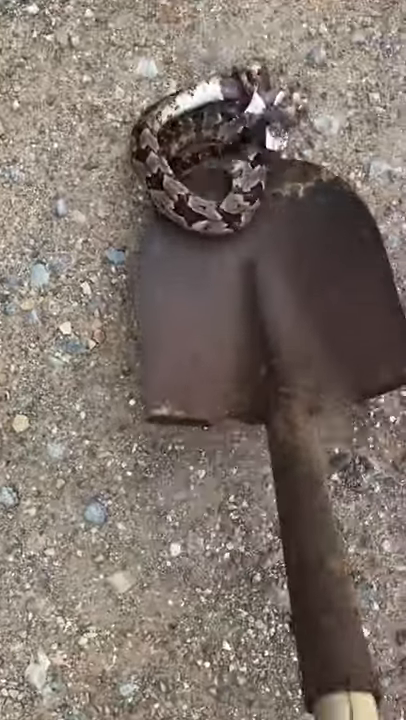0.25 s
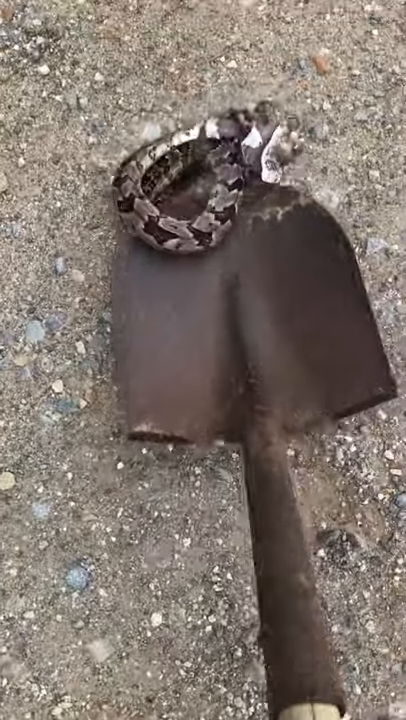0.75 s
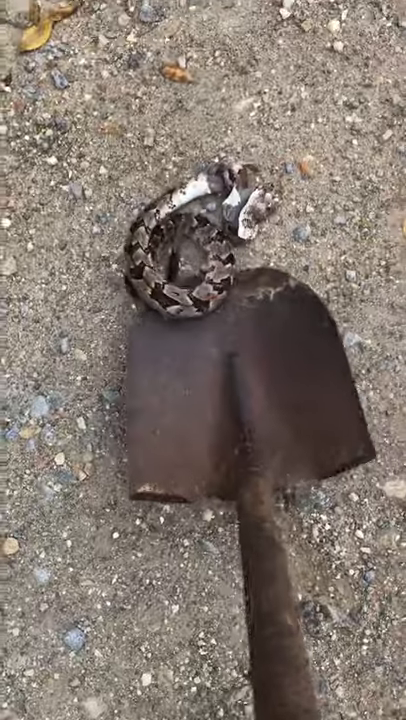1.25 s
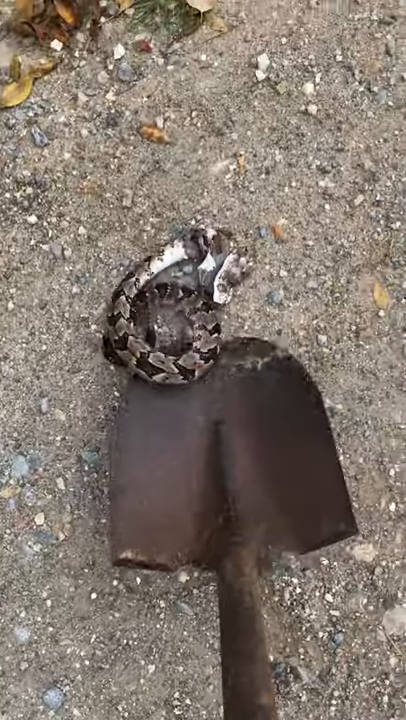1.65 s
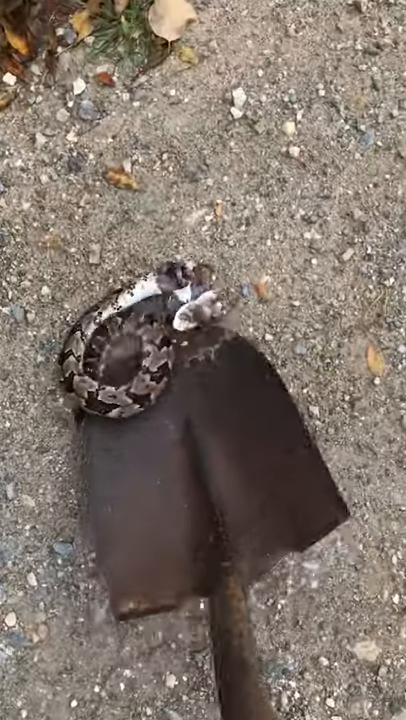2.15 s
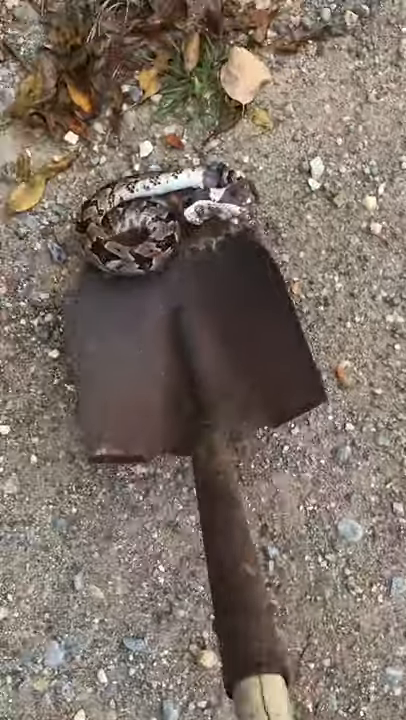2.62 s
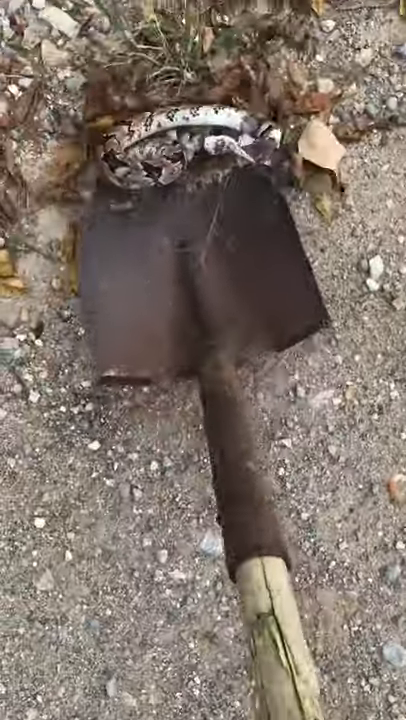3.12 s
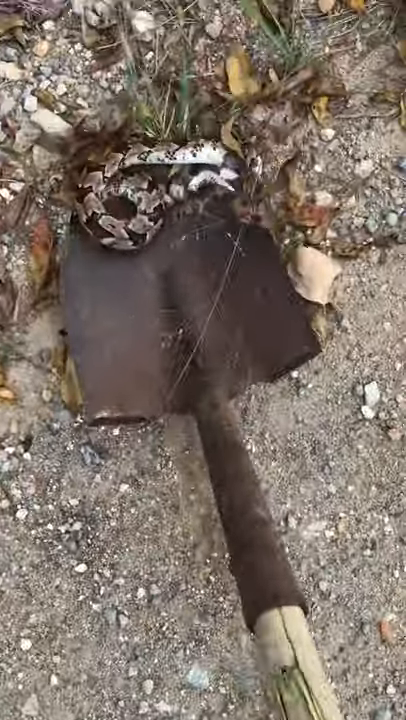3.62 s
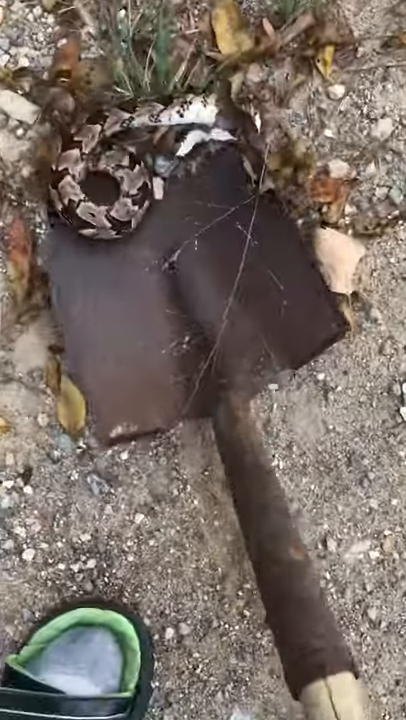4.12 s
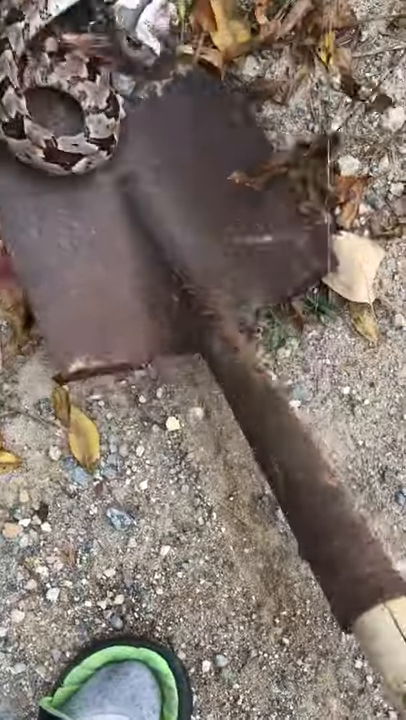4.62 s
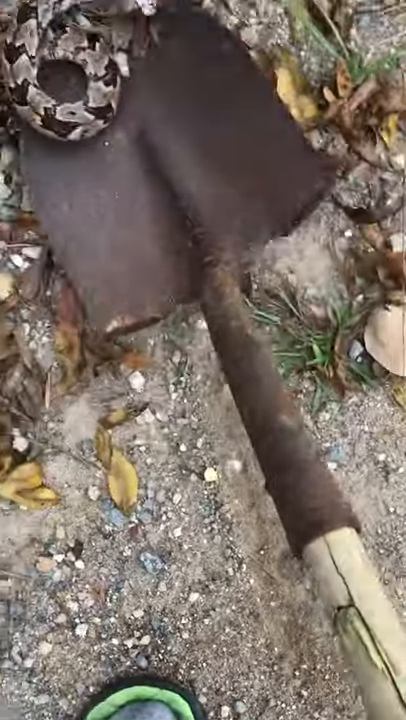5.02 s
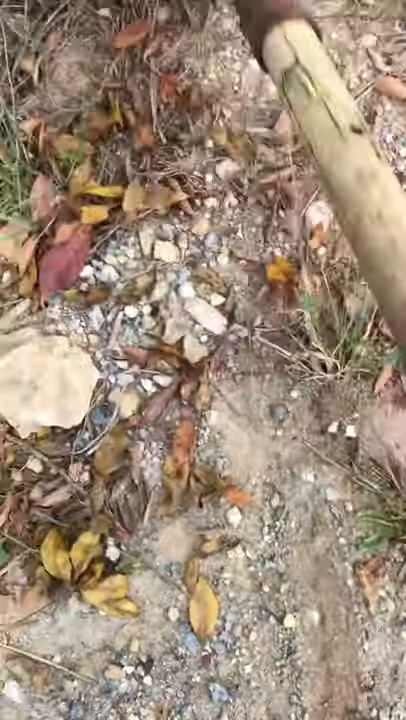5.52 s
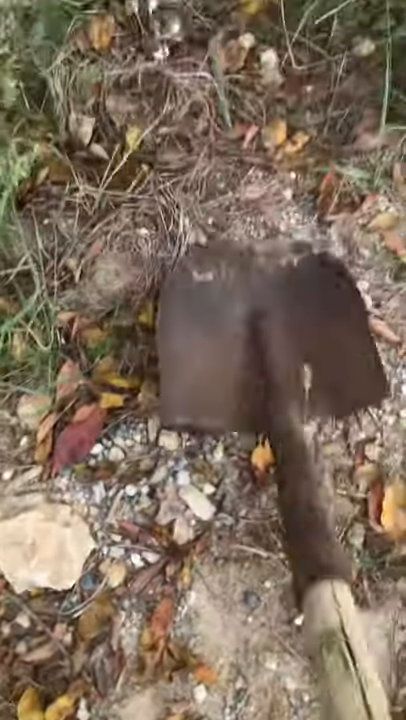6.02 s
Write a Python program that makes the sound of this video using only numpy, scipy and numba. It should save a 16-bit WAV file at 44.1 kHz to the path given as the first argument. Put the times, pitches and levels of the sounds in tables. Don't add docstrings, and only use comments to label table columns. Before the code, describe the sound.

A steel shovel is pushed in jerks over a gravel road, grating and clacking against stones, while a faint cricket trills in open air.

```python
import sys
import numpy as np
from scipy import signal
from scipy.fft import rfft, irfft
from scipy.io import wavfile
from scipy.ndimage import uniform_filter1d
from numba import njit

SR = 44100
rng = np.random.default_rng(int(sys.argv[2]) if len(sys.argv) > 2 else 0)


def how_loud(loudness_db):
    steps = np.asarray(loudness_db, float) / 20
    return 10 ** steps


def transcribe(signal):
    frames = np.atleast_2d(signal).T
    limited = np.clip(frames, -1, 1)
    pcm = np.round(limited * 32767).astype(np.int16)
    wavfile.write(sys.argv[1], SR, pcm)


N = 276058
STEP = 32

# start t/s, stop t/s, grit level/dB, sand share level/dB, blade share level/dB
SKID_EVENTS = [(0.357, 0.354, -51, 5, -1), (0.373, 0.397, -51, 7, 6.5), (1.159, 1.183, -48.5, -8, -8),
               (2.24, 2.288, -21, -7, 8), (2.34, 2.36, -31.5, -3.5, -4), (2.666, 2.697, -37.5, -2, 4.5),
               (2.722, 2.725, -36, -3, 8.5), (3.879, 3.941, -29, -4, 6.5), (3.999, 4.061, -54, -8, 12),
               (5.932, 5.976, -29, 2, -2.5), (5.616, 5.656, -47.5, 5, -13), (5.69, 5.734, -51.5, 9.5, -18),
               (5.751, 5.87, -57, 8.5, -16.5), (5.99, 6.038, -49, -2, -1)]
# t/s, thud level/dB, sand share level/dB, pitch the struck spot favours f/Hz
KNOCK_EVENTS = [(0.031, -24, -24, 930), (0.048, -24, -9, 940), (0.113, -25, -0.5, 943.4),
                (0.508, -33.5, -8, 1550), (0.638, -28.5, -4.5, 1520), (0.698, -25, -17, 1710),
                (0.738, -32, -1.5, 966.1), (1.374, -39.5, -40, 1260), (1.4, -37, -43, 2040),
                (1.775, -20, 9, 1736), (1.84, -25.5, -2.5, 1790), (1.921, -30, -38, 700),
                (2.296, -10, -9, 800), (2.524, -17, -5, 1950), (2.669, -25.5, -17, 1950),
                (2.719, -26, -20, 1950), (3.222, -30, -15.5, 1950), (3.249, -13.5, -24, 1200),
                (3.325, -15, -10, 1500), (3.653, -30, -10, 950.6), (3.807, -24.5, -1, 910),
                (3.835, -14.5, -36, 1038), (3.862, -16, -23, 860), (3.885, -9.5, -8.5, 1400),
                (4.009, -24, -1.5, 1699), (4.538, -24, -10, 905.1), (4.683, -24, -5, 1880),
                (4.799, -16, -20, 1206), (4.874, -16.5, -15, 1000), (6.17, -25.5, 2.5, 896)]
# t/s, crunch level/dB, sand share level/dB, pitch the struck spot favours f/Hz
CRUNCH_EVENTS = [(0.593, -33.5, 0.5, 3202), (1.634, -35, -2.5, 2700), (1.692, -28.5, 0, 2087),
                 (1.748, -24, -15, 1460), (2.238, -9, -4, 2448), (2.465, -23.5, -16, 3220),
                 (2.69, -31, 4, 2960), (2.849, -22, -19, 909.8), (2.919, -23, -36, 2150),
                 (3.063, -28, 3, 921), (3.083, -19.5, -10, 900), (3.151, -21, -7, 915),
                 (3.299, -22.5, -8.5, 3088), (3.365, -20.5, -4.5, 3146), (3.76, -22.5, -32, 1732),
                 (3.925, -19, -11, 1199), (4.745, -25, 3, 1850), (5.271, -25, -5, 940),
                 (5.93, -15, -34, 1947), (5.976, -18, -2, 1943), (0.655, -39, -2, 1700),
                 (0.796, -33, -4.5, 3002), (0.858, -36.5, -12, 2499), (2.81, -35.5, 2, 1502),
                 (2.836, -37, -2.5, 921.5), (2.883, -37, 10, 851.8), (2.99, -32, -14.5, 920),
                 (3.103, -28, 0, 1870), (3.18, -32.5, -1, 1401), (3.38, -28, -1, 4600),
                 (4.559, -32, 2, 3480), (4.725, -22, -5, 1401), (4.823, -24.5, -5, 4000),
                 (4.885, -23.5, -2, 1496), (5.118, -38.5, 2, 890), (5.197, -38, 0, 900),
                 (5.425, -44, 7, 1140)]


def curve(table):
    s, *columns = np.transpose(table)
    return np.array([np.interp(np.arange(N) / SR, s, c) for c in columns])


def slow_time():
    return np.arange(0, N, STEP) / SR


def unit(x):
    return x / np.sqrt(np.mean(x ** 2))


def band(x, lo_hz, hi_hz, order=2):
    return signal.sosfilt(signal.butter(order, [lo_hz, hi_hz], "bandpass", fs=SR, output="sos"), x)


def walk(rate):
    k = int(SR / rate)
    held = np.repeat(rng.standard_normal(N // k + 1), k)
    return 1.63 * uniform_filter1d(uniform_filter1d(held, k), k)[:N]


@njit
def grains(start, hz, cycles, size):
    out = np.zeros(N + 20000)
    for k in range(len(start)):
        turn = 2 * np.pi * hz[k] / SR
        p = np.exp(1j * turn - turn / (2 * np.pi * cycles[k]))
        z = size[k] * np.exp(1j * turn / 2)
        for i in range(min(20000, int(6 * cycles[k] * SR / hz[k]))):
            out[start[k] + i] += z.imag
            z *= p
    return out[:N]


@njit
def ring(force, hz, loss):
    out, z, p = np.empty(N), 0j, np.exp(2j * np.pi * hz / SR)
    for i in range(N):
        z = z * p * (1 - loss[i]) + force[i]
        out[i] = z.imag
    return out


def air():
    # f/Hz, density level/dB
    hiss_colour = [(88, -38), (150, -6), (380, -9.5), (466, -12.5), (2920, -20), (3620, -11.5), (4860, -45),
                   (8730, -26), (16000, -27)]
    colour_hz, colour_db = np.transpose(hiss_colour)
    hz = np.arange(N // 2 + 1) * SR / N + 1
    colour = how_loud(np.interp(np.log(hz), np.log(colour_hz), colour_db))
    return how_loud(-59.5) * unit(irfft(rfft(rng.standard_normal(N)) * colour, N))


def cricket(hz=3600, trill_hz=38):
    # t/s, level/dB
    trill_level = [(0, -58.5), (.35, -58), (.65, -57), (.95, -55.5), (1.3, -58.5), (1.7, -48), (2.1, -55),
                   (4.1, -59), (6.26, -71)]
    wing = np.cumsum(trill_hz * (1 + 0.054 * walk(12)) / SR) % 1
    glide_hz = hz * (1 + 0.027 * (.5 - wing))
    tone = np.sin(2 * np.pi * np.cumsum(glide_hz) / SR) * np.sin(np.pi * wing) ** 2
    chorus = unit(band(rng.standard_normal(N), 3590.0, 3694.0))
    return how_loud(curve(trill_level)[0]) * (0.5 * tone * how_loud(1.6 * walk(5.6)) + 0.3852 * chorus)


def wind():
    # peak t/s, rumble level/dB, time to fall 10 dB t/s
    gust_events = [(0.6, -57, 0.5), (1.42, -47, 0.19), (2.19, -36, 0.11), (2.78, -49.5, 0.0575),
                   (3.25, -41.5, 0.09), (3.52, -43, 0.16), (3.87, -33, 0.07), (4.2, -37.5, 0.0551),
                   (4.399, -34, 0.08), (4.569, -34, 0.01), (4.8, -42, 0.0834), (4.98, -29.5, 0.044),
                   (5.15, -55, 0.2143), (5.55, -43, 0.1397)]
    # t/s, peak level/dB, f/Hz
    buffet_events = [(0.695, -46, 123), (1.782, -38.5, 145), (2.185, -39, 130), (2.125, -37, 254),
                     (5.51, -43.5, 258), (5.587, -41, 148), (2.016, -39, 142.5), (2.083, -32, 121),
                     (2.22, -30.5, 248.8), (2.293, -40, 300), (2.821, -42, 135.8), (3.01, -37.5, 119.7),
                     (3.078, -39.5, 193), (3.243, -40, 132.4), (3.434, -32.5, 143), (3.45, -39, 236),
                     (4.405, -49, 230.1), (4.964, -50, 186), (5, -57, 199.3), (5.55, -42.5, 187),
                     (3.843, -42, 173.9), (3.916, -33, 120.9), (4.376, -44, 130), (4.797, -51, 119.1),
                     (2.139, -43, 221.1), (1.031, -58, 306), (5.458, -42, 131.2)]
    t = np.arange(N) / SR
    calm_db = -57.5
    gust = how_loud(calm_db) + sum(how_loud(db - 10 * abs(t - s) / fall) for s, db, fall in gust_events)
    rumble = unit(band(rng.standard_normal(N), 42.6, 86.0)) * how_loud(1.07 * walk(18))
    flutter = unit(band(rng.standard_normal(N), 111.0, 185.4, order=3)) * how_loud(5.9 * walk(24) - 20.5)
    s, peak_db, hz = np.transpose(buffet_events)
    buffets = grains((s * SR).astype(np.int64), hz, np.full(len(s), 2.2), how_loud(peak_db + 1.0))
    return gust * (rumble + flutter) + band(buffets, 83.24, 560.0)


def free_blade():
    # f/Hz, level/dB, t60 t/s
    free_modes = [(338, -16, 0.57), (517.5, -19, 1.6), (809, -9, 0.64), (947, -6.5, 0.33),
                  (1140, -8.5, 0.17), (1350, -15, 0.25), (1544, -14.5, 0.3), (1710, -3, 0.13),
                  (1990, -13, 0.28), (1895, -14, 0.32), (2070, -9, 0.34), (2300, -5, 0.2),
                  (2940, -5, 0.0889)]
    # t/s, level/dB, pitch the struck spot favours f/Hz
    taps = [
        (5.419, -46.5, 1130),
        (5.53, -44.5, 1640),
        (5.58, -46, 1950),
        (5.62, -50, 1480),
        (5.655, -50, 800),
        (5.932, -39, 1950),
        (5.945, -36, 1727),
        (5.985, -32.5, 1740),
        (6.09, -49, 1950),
        (6.169, -41, 1650),
    ]
    spot_gain_db, scatter = 9.5, 1.5
    s, tap_db, spot_hz = np.transpose(taps)
    scatter_db = scatter * rng.standard_normal((len(s), len(free_modes)))
    out = 0
    for (hz, db, t60), chance_db in zip(free_modes, scatter_db.T):
        spot_db = spot_gain_db * np.exp(-(np.log(spot_hz / hz) / 0.12) ** 2)
        force = np.zeros(N)
        force[(s * SR).astype(int)] = how_loud(tap_db + db + chance_db + spot_db)
        out = out + ring(force, 1. * hz, np.full(N, np.log(1000) / (max(t60, .02) * SR)))
    return out


def pings():
    # t/s, peak level/dB, f/Hz
    stone_pings = [(0.595, -47.5, 3170), (0.697, -37, 3820), (0.739, -34, 5600), (2.239, -14, 4060),
                   (2.243, -10.5, 2430), (2.247, -13, 2974), (2.465, -25.5, 3105), (2.466, -32, 2390),
                   (2.245, -21, 700), (2.297, -8.5, 812), (2.29, -14, 4010), (1.923, -38.5, 1192),
                   (2.525, -25, 4020), (2.69, -31, 5500), (2.699, -27.5, 2990), (2.712, -35.5, 6900),
                   (2.731, -36.5, 5230), (3.064, -29, 4050), (3.084, -36, 3080), (3.151, -22.5, 5300),
                   (3.3, -23, 3080), (3.366, -21, 3090), (3.886, -13, 3070), (5.52, -36.5, 5370),
                   (5.93, -12.5, 2053), (5.932, -21.5, 2700), (5.935, -12.5, 2813), (5.975, -19, 5410),
                   (5.979, -21.5, 2180), (6.012, -38.5, 8700), (6.171, -29.5, 2347), (6.169, -30, 870),
                   (5.945, -33, 1394), (5.97, -27, 1512), (6.116, -33, 4430), (3.837, -27, 1021)]
    # t/s, peak level/dB, f/Hz
    mode_blows = [(0.031, -30.5, 900), (0.05, -21.5, 1550), (0.048, -25, 1230), (0.072, -19.5, 990),
                  (0.073, -31, 1703), (0.114, -24, 943.1), (0.699, -35, 1400), (0.74, -36, 990),
                  (1.776, -26.5, 1723), (1.778, -37, 933.3), (2.258, -23.5, 635), (2.279, -13.5, 930),
                  (2.268, -19, 1350), (2.298, -37.5, 339), (2.53, -52.5, 339), (3.0, -52, 339),
                  (3.15, -51, 339), (2.25, -20, 1420), (5.985, -52, 630), (2.299, -15.5, 1723),
                  (2.298, -17, 750), (2.352, -27, 1950), (2.355, -37, 870), (2.524, -28, 1950),
                  (2.53, -24.5, 910), (2.555, -31, 922.8), (2.717, -22.5, 920), (3.89, -25, 1723),
                  (3.925, -23.5, 900), (4.012, -35.5, 1723), (4.535, -29.5, 880), (4.872, -22.5, 910),
                  (5.272, -31, 920), (5.275, -34.5, 1723), (6.169, -24, 900), (6.0, -41, 1020),
                  (2.29, -23, 1320), (1.78, -29, 1240), (0.87, -44, 1950)]
    # t/s, peak level/dB, f/Hz
    click_events = [(1.015, -31, 5500), (1.075, -32, 5495), (1.42, -19, 1998), (1.424, -11.5, 2430),
                    (1.921, -22.5, 907), (2.239, -3, 3500), (2.297, -10, 1500), (2.43, -35, 3000),
                    (1.776, -13.5, 4500), (2.969, -25, 7000), (3.886, -9, 2520), (3.985, -36, 2500),
                    (4.582, -24, 6000), (4.622, -18.5, 5996), (5.574, -14, 6960), (5.788, -25.5, 5994),
                    (5.885, -22.5, 5000), (0.113, -19, 3503), (0.508, -26, 4050), (3.063, -25, 5000),
                    (3.299, -24, 3505), (0.698, -35, 590), (0.215, -37, 5496), (0.228, -25, 5990)]
    ping_fade_ms, ring_fade_ms, rise_ms = 5.05, 16.9, 0.39
    s, peak_db, hz = np.transpose(stone_pings + mode_blows)
    mode_hz = hz[len(stone_pings):]
    mode_fade_ms = ring_fade_ms * np.clip(840 / mode_hz, 1, None) ** 1.5
    mode_fade_ms *= 1 + 0.37 * (abs(mode_hz / 1723 - 1) < .02)
    fade_ms = np.r_[np.full(len(stone_pings), ping_fade_ms), mode_fade_ms]
    start = (s * SR).astype(np.int64)
    tones = grains(start, hz, hz * fade_ms / 1000, how_loud(peak_db))
    tones = tones - grains(start, hz, hz * rise_ms / 1000, how_loud(peak_db))
    s, peak_db, hz = np.transpose(click_events)
    clicks = grains((s * SR).astype(np.int64), hz, np.full(len(s), 0.7), how_loud(peak_db + 3.5))
    return tones + band(clicks, 300.0, 11060)


def ticks(s, shares_db, chance, cycles, scatter_db, spot_hz=None):
    # f/Hz, level/dB
    tick_colour = [(600, -0.5), (850, -0.5), (1300, 1), (2200, 2.5), (3500, 4), (5500, 5.5), (8500, 8.5),
                   (11000, 3), (15500, 7)]
    colour_hz, colour_db = np.transpose(tick_colour)
    hz = 620 * (15800 / 620) ** chance[0]
    place = np.interp(np.log(hz), np.log([1150, 3600, 9500]), [0, 1, 2])
    db = sum(np.clip(1 - abs(place - k), 0, 1) * shares_db[k] for k in range(3))
    db = db + np.interp(np.log(hz), np.log(colour_hz), colour_db)
    if spot_hz is not None:
        db = db + 4 * np.exp(-(np.log2(hz / spot_hz) / 0.2) ** 2)
    size = how_loud(db - scatter_db * np.log(chance[1] + 0.008))
    size = size * np.sqrt(hz / 3600) * np.sign(chance[2] - .5)
    start = np.clip(s * SR, 0, N - 1).astype(np.int64)
    return grains(start, hz, cycles * (.5 + chance[3]), size / np.sqrt(cycles))


def stroke(start, stop, end_db, swell_db, let_go_db_s):
    t = slow_time()
    grip_s = 0.012
    db = np.interp(t, [start, stop], [end_db - swell_db, end_db]) - let_go_db_s * np.clip(t - stop, 0, 1)
    return (how_loud(db) * np.clip((t - start) / grip_s + 1, 0, 1)) ** 2


def push():
    # t/s, level/dB
    trickle = [(0, -52), (1.25, -61.5), (1.96, -71), (2.3, -50), (4.1, -54.5), (6.26, -52.5)]
    # start t/s, stop t/s, grit at the stop level/dB, swell level/dB, sand share level/dB
    shoves = [(0.0, 0.06, -23, 29, -2), (0.066, 0.191, -46, 5, 0), (0.22, 0.262, -55.5, 6, 8.5),
              (0.598, 0.653, -44, 11, 2), (0.68, 0.807, -44, -0.5, -2), (0.807, 0.894, -51, -6.5, -5),
              (1.371, 1.407, -34.5, 7.5, -20), (1.463, 1.619, -57, 0, -6), (1.622, 1.653, -53, -1, 0),
              (1.687, 1.723, -46, -3, 0), (1.74, 1.769, -34.5, 3.5, 1), (1.809, 1.958, -46.5, -5.5, -12.5),
              (1.992, 2.017, -45, -4.5, -12), (2.054, 2.064, -47.5, -7, 2.5), (2.12, 2.145, -50.5, -3, 8),
              (2.037, 2.227, -40.5, 8, -4.5), (2.437, 2.618, -42.5, 2, -4), (2.757, 2.83, -45.5, 8, -1.5),
              (2.832, 2.937, -40.5, 2, 2.5), (2.962, 3.043, -36, 7.5, -1), (3.062, 3.102, -36.5, -1, -3.5),
              (3.123, 3.181, -33.5, 4.5, -1.5), (3.205, 3.269, -34.5, 1, -1), (3.295, 3.367, -31.5, 1, -1),
              (3.393, 3.429, -44, -2.5, 3.5), (3.415, 3.56, -65, 9, 12), (3.642, 3.69, -37.5, 1.5, -9),
              (3.723, 3.84, -34.5, 3, -5.5), (3.851, 3.876, -24.5, 4, -6.5), (3.948, 3.981, -47.5, 1, 6.5),
              (4.164, 4.538, -43, 3.5, 2.5), (4.507, 4.608, -35.5, 5, 5.5), (4.626, 4.74, -34, 4, 2),
              (4.764, 4.888, -33, 1, 2), (4.887, 4.922, -44, -2, -0.5), (4.92, 5.066, -51, -2.5, -12),
              (5.084, 5.175, -37, 9.5, 0), (5.189, 5.299, -41, -4, 2.5), (5.307, 5.592, -45.5, 2.5, 3),
              (5.866, 5.929, -45.5, 7, 7), (6.074, 6.183, -42.5, 3.5, 7.5)]
    power = how_loud(curve(trickle)[0, ::STEP]) ** 2 * how_loud(np.array([[-3.5], [0], [0]])) ** 2
    for start, stop, db, swell_db, sand_db in shoves:
        shares_db = np.array([[2 - 0.24 * sand_db], [0], [sand_db]])
        power = power + stroke(start, stop, db, swell_db, let_go_db_s=516) * how_loud(shares_db) ** 2
    for start, stop, db, sand_db, blade_db in SKID_EVENTS:
        shares_db = np.array([[blade_db], [0], [sand_db]])
        power = power + stroke(start, stop, db, -2.5, let_go_db_s=908) * how_loud(shares_db) ** 2
    return 10 * np.log10(power)


def scrape(shares_db, count=100000, jerk_db=1.0, patchy_db=1.3):
    chance = rng.random((count, 5)).T
    jerks_db = jerk_db * (walk(35) + 0.75 * walk(150))
    jerks_db = jerks_db + patchy_db * np.array([walk(70) for _ in shares_db])
    jerky_db = shares_db + jerks_db[:, ::STEP]
    moment = (chance[4] * N).astype(int) // STEP
    return ticks(chance[4] * N / SR, jerky_db[:, moment] - 6.6, chance, cycles=2.87, scatter_db=2.5)


def cracks(count=60):
    # t/s, crack level/dB, sand share level/dB
    chips = [(0.07, -18.5, 1.5), (0.113, -24.5, -17), (1.022, -45, -2.5), (1.034, -43, -10),
             (1.126, -44, -29), (1.174, -36, -14), (1.423, -24.5, -32), (1.774, -21, -3), (1.508, -36, -32),
             (1.553, -30.5, -34), (1.921, -25, -24), (3.488, -37, 1.5), (3.568, -37, -3),
             (3.885, -16.5, -5.5), (4.095, -37, 0), (4.981, -36.5, -3), (5.023, -42, 3), (5.965, -21, 1),
             (0.738, -32.5, -2), (2.9, -40, 12), (3.084, -28, -6), (3.337, -23, -6.5), (4.831, -30, -10.5),
             (4.944, -36, -2), (5.709, -44, 6), (6.091, -40, -1)]
    # t/s, snap level/dB, grit share level/dB
    snaps = [(0.149, -39, 11), (0.315, -35, -25), (0.806, -33, -28), (0.941, -40, -29), (0.963, -42.5, -29),
             (1.671, -41, -12.5), (1.733, -42, -10), (1.807, -37.5, -11), (1.819, -33, -18),
             (1.869, -34, -24), (1.899, -38, -8), (1.991, -46, -4), (2.056, -44, -23), (2.125, -36, -2),
             (2.97, -33, -14), (3.441, -34, -3), (4.197, -48, -14.5), (4.581, -22, -13), (4.62, -27, 0),
             (5.45, -27.5, -13.5), (5.574, -27.5, -5), (5.62, -32, -3), (5.682, -30.5, -18),
             (5.7, -30, -12), (5.788, -28, -20), (5.885, -38, 2.5), (6.116, -23, -11), (6.128, -27, -9),
             (6.149, -34, -2)]
    # time s, favoured Hz, rise ms, fade ms, thud dB, grit dB, sand dB
    stones = [(s, hz, 1.3, 2.4, db, db - 5 + 0.34 * sand, db + sand) for s, db, sand, hz in KNOCK_EVENTS]
    stones += [(s, hz, 1.3, 5, db - 5, db, db + sand) for s, db, sand, hz in CRUNCH_EVENTS]
    stones += [(s, 2800, 0.55, 0.5, db - 3.5, db, db + sand) for s, db, sand in chips]
    stones += [(s, 6000, 0.55, 0.9, db + grit - 20, db + grit, db) for s, db, grit in snaps]
    chance = rng.random((len(stones), count, 6)).reshape(-1, 6).T
    s, spot_hz, rise_ms, fade_ms, *shares_db = np.repeat(np.array(stones), count, axis=0).T
    late_ms = -(np.log(chance[4]) * fade_ms + np.log(chance[5]) * rise_ms) - rise_ms
    return ticks(s + late_ms / 1000, np.array(shares_db) - 5.0, chance,
                 cycles=3.75, scatter_db=1.03, spot_hz=spot_hz)


def blade(force, spot_db=4, spread=0.072):
    # f/Hz, level/dB, free t60 t/s
    blade_modes = [(341, -23.5, 0.55), (534, -20, 0.21), (639, -15.5, 0.14), (767, -28, 0.16),
                   (899, -3, 0.087), (932, -4.5, 0.23), (1130, -15.5, 0.051), (1213, -14, 0.28),
                   (1340, -12, 0.1167), (1430, -12.5, 0.18), (1487, -5, 0.11), (1537, -7, 0.21),
                   (1727, -5, 0.17), (1950, -4, 0.18), (2113, -6.5, 0.11), (2303, -15, 0.0758),
                   (2455, -12, 0.1), (2940, -13, 0.092), (3140, -5, 0.088),(4190, -6.5, 0.1)]
    # f/Hz, level/dB, t60 t/s
    edge_modes = [(2545, -7, 0.14), (3410, -4.5, 0.054), (3840, -21, 0.039), (4546, -3, 0.045),
                  (5500, -5, 0.098), (6050, -4.5, 0.05), (6820, -16, 0.073), (9800, -5, 0.055)]
    # t/s, freedom (0 pressed into the road - 1 in the air)
    freedom = [(0, 0.79), (1.2, 0.1), (2.29, 0.14), (2.31, 0.76), (2.9, 0.47), (5.5, 0.19), (5.9, 0.37),
               (6.26, 4.6)]
    t = np.arange(N) / SR
    pressed = 0.2367 * sum((t > start) & (t < stop) for start, stop, *_ in SKID_EVENTS)
    damping = 1 + 2.37 * np.clip(1 - curve(freedom)[0] + pressed, 0, 1) ** 2
    s, *_, spot_hz = np.transpose(sorted(KNOCK_EVENTS + CRUNCH_EVENTS))
    spot_hz = spot_hz[np.clip(np.searchsorted(s - .003, slow_time()) - 1, 0, None)]
    out = 0
    for hz, db, t60 in blade_modes + edge_modes:
        drive_db = db + 1.54 * walk(40)[::STEP] + spot_db * np.exp(-(np.log(spot_hz / hz) / spread) ** 2)
        drive = np.repeat(how_loud(drive_db), STEP)[:N]
        out = out + ring(force * drive, 1. * hz, damping * np.log(1000) / (max(t60, .02) * SR))
    return band(out, 260.0, 22000, order=3)


def scene():
    grit = scrape(push())
    broken = band(cracks(), 310, 13600, order=1)
    direct = band(grit + broken, 826.0, 14550, order=3)
    shovel = direct + how_loud(-37.5) * blade(grit + how_loud(-2.5) * broken)
    bounce = np.r_[np.zeros(17), shovel[:-17]]
    return (shovel - how_loud(-17.5) * bounce + free_blade() + pings() + wind() + cricket() + air())[None]


def band_limit(x):
    return signal.sosfilt(signal.butter(12, 16810, fs=SR, output="sos"), x)


def record(dry):
    soft = np.tanh(0.6 * dry) / 0.6
    cut = signal.sosfilt(signal.ellip(10, .2, 60, 16000, fs=SR, output="sos"), soft)
    return band_limit(cut)


dry = scene()
out = record(dry)
transcribe(out)
```